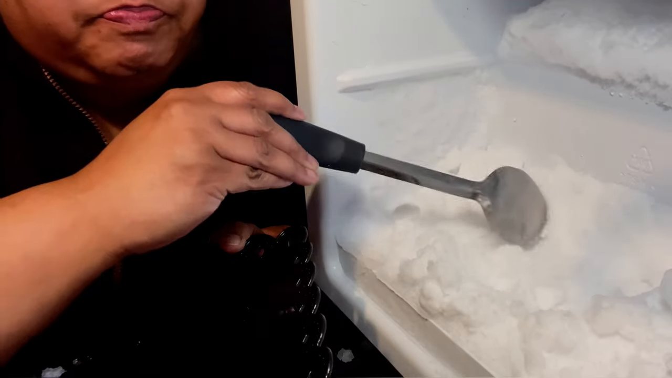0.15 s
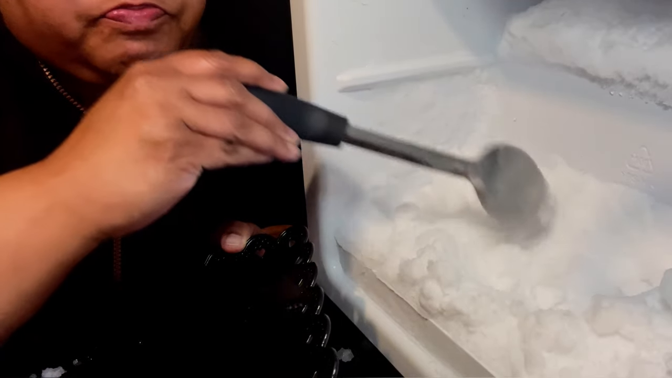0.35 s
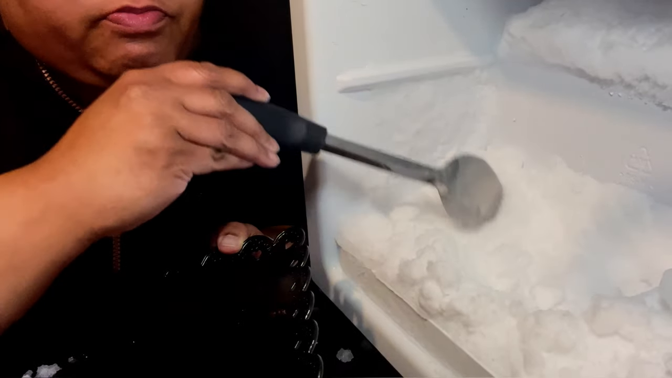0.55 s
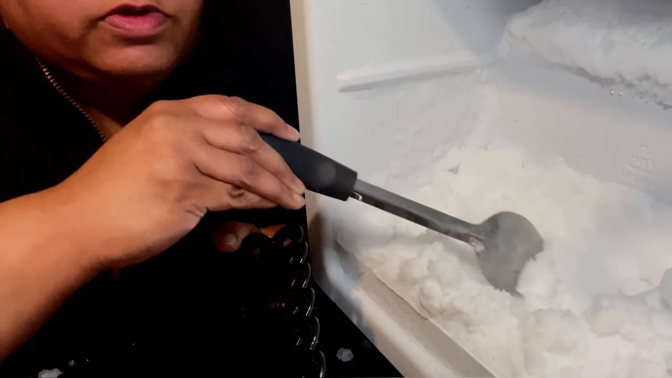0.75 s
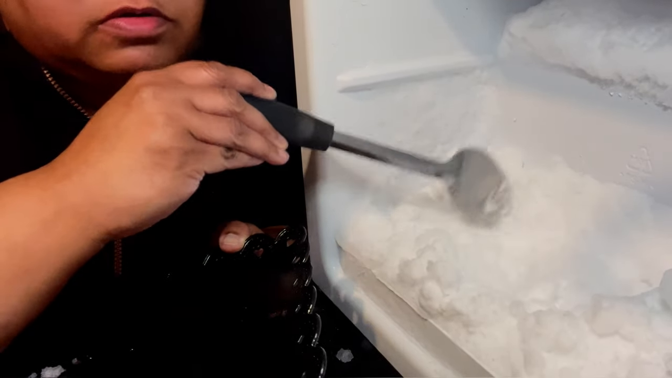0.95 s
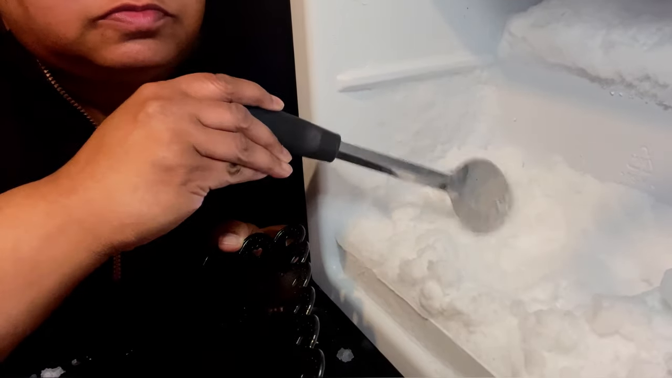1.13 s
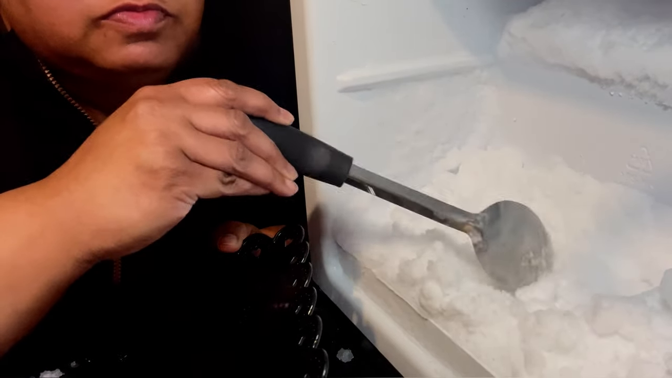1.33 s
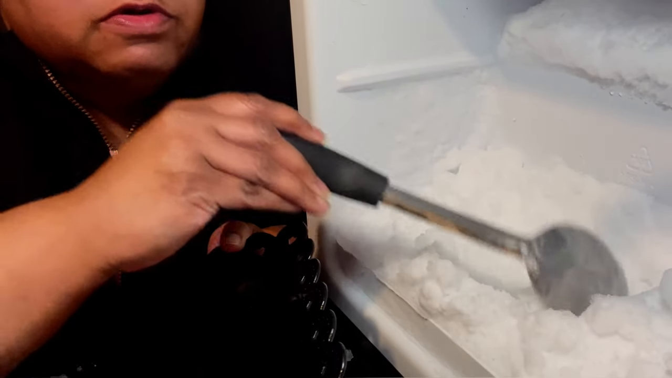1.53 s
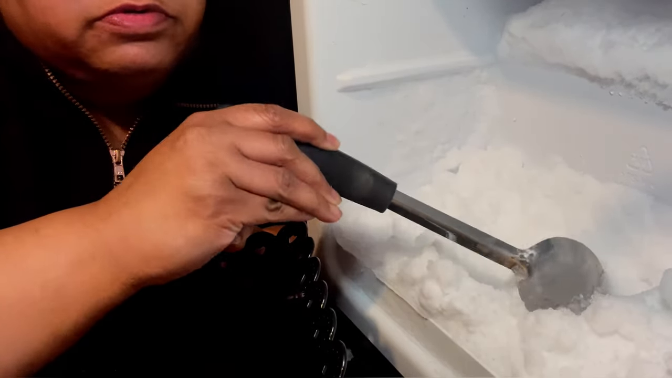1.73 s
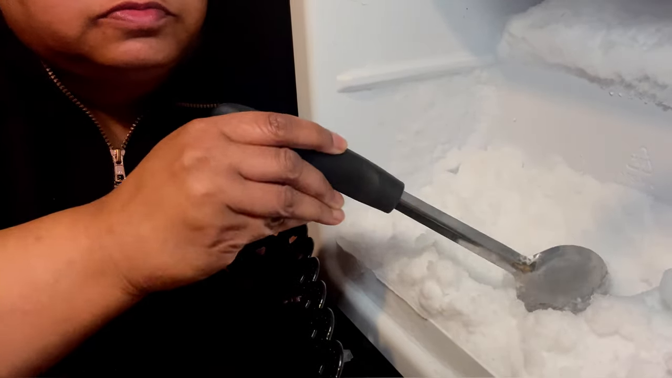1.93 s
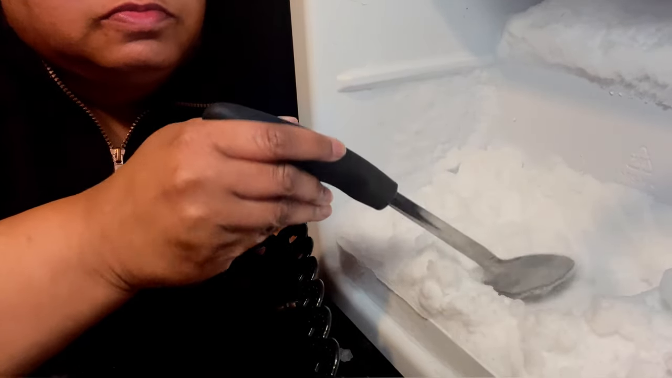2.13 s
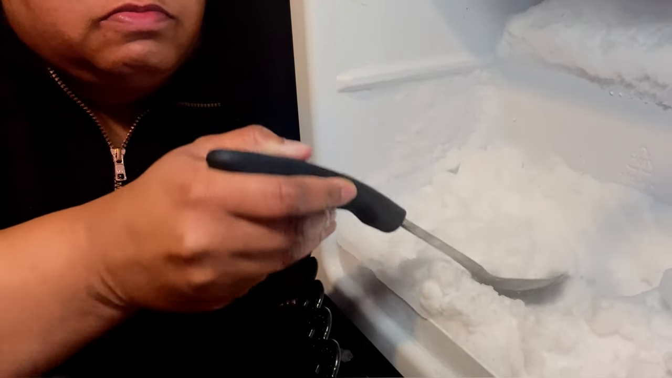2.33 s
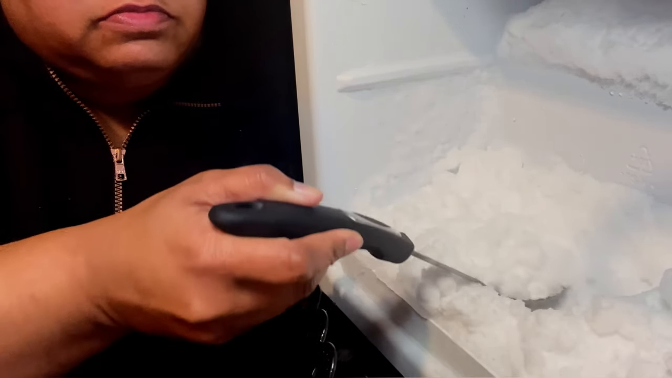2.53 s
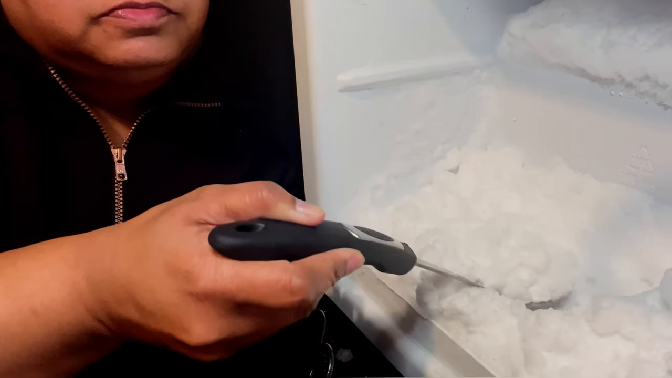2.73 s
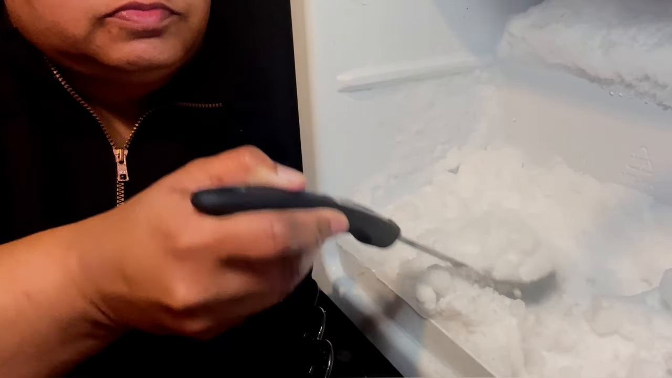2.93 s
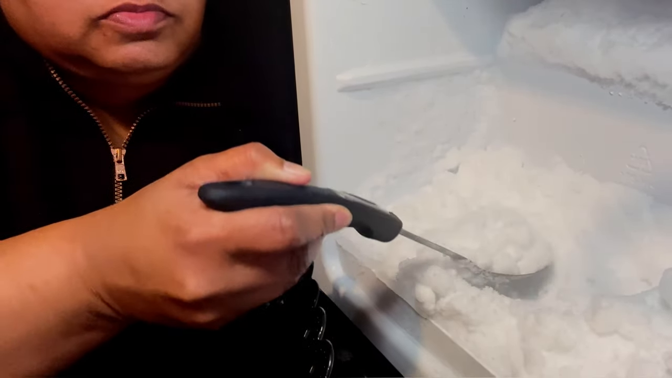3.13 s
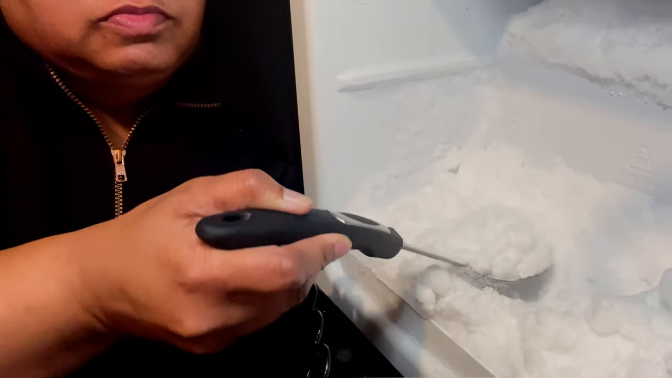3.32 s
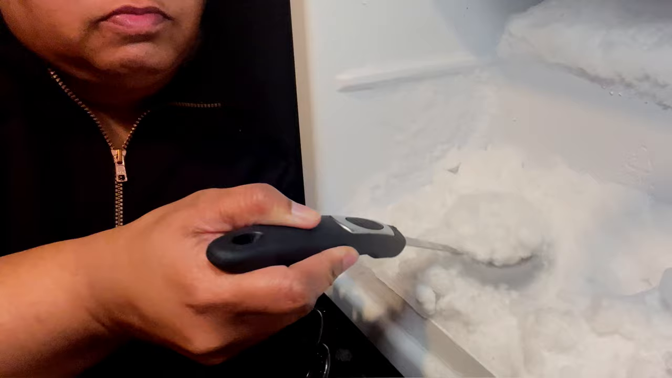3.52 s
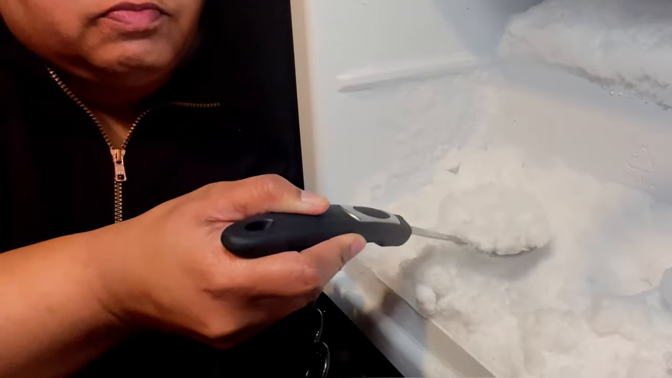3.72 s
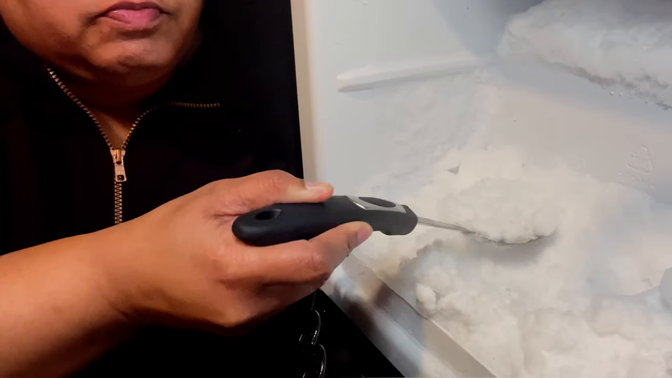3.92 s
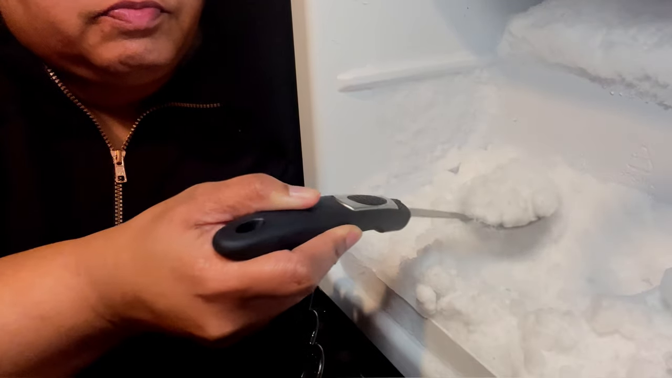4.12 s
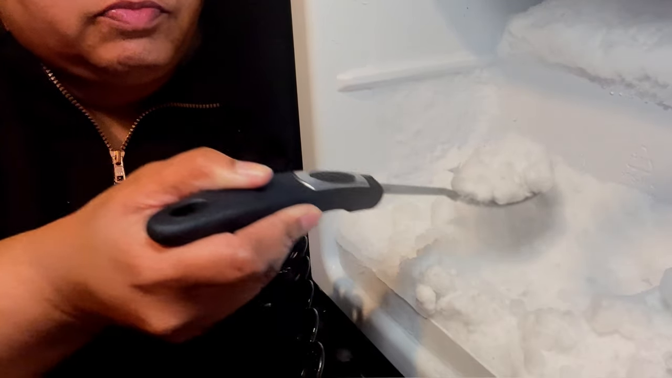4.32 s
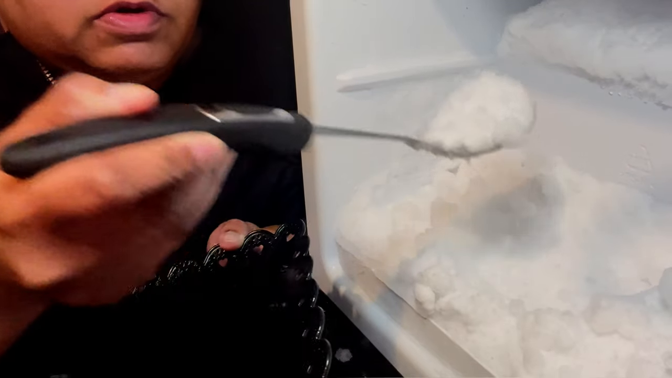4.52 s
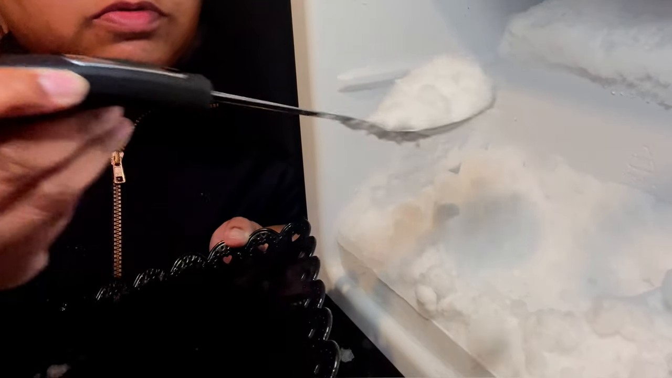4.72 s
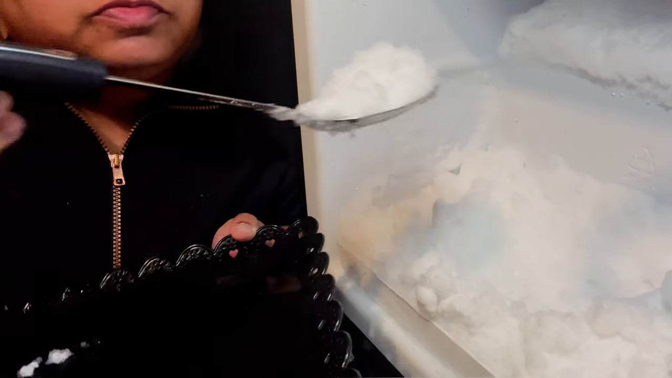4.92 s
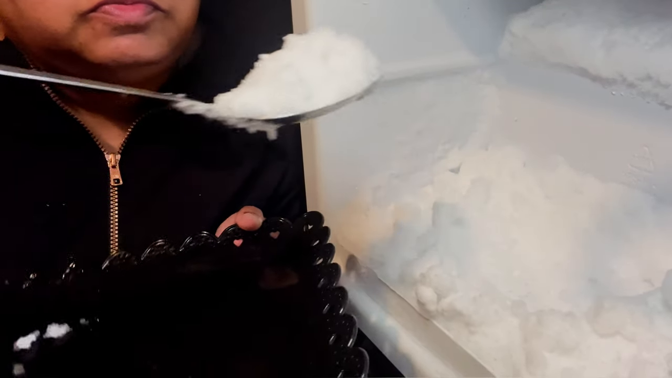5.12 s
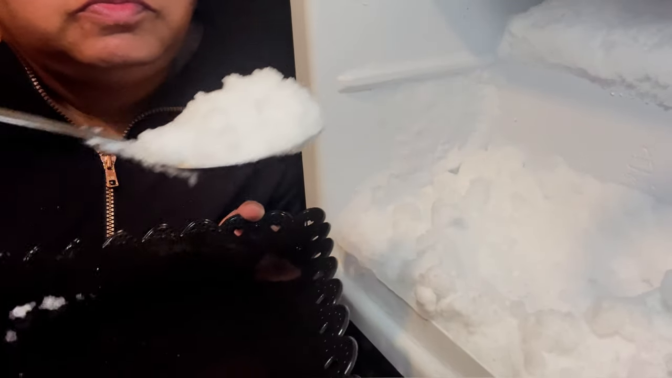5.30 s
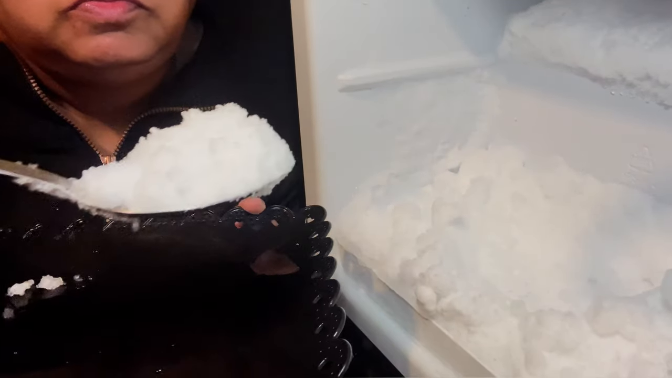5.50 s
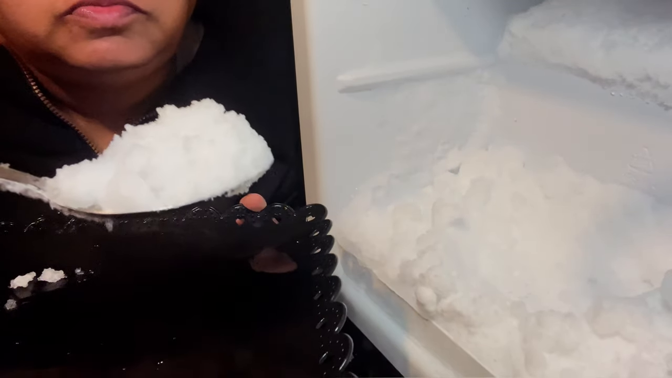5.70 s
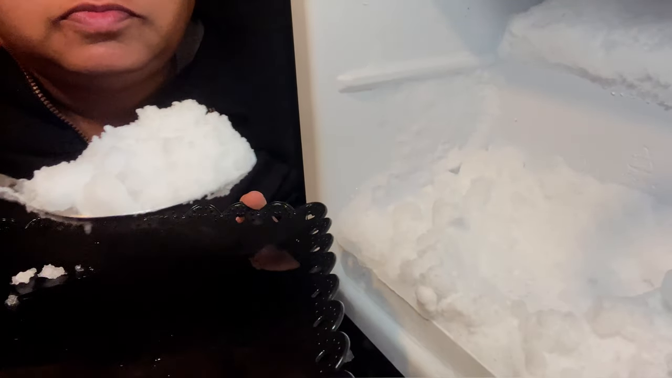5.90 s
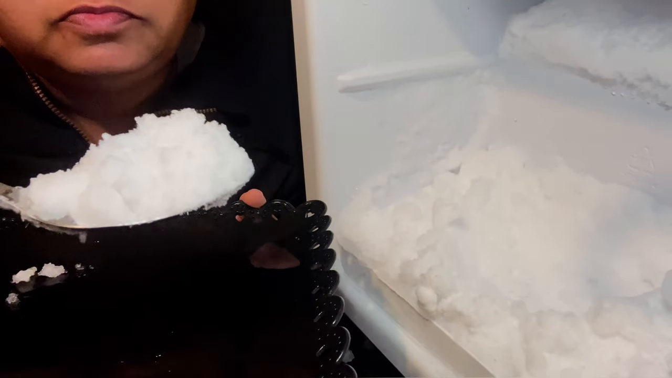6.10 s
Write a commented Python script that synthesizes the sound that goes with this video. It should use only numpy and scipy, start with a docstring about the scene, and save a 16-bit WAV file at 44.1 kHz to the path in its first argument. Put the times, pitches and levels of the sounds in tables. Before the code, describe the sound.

Quick, bright spoon scrapes bite into icy frost, with loud hollow knocks from the plastic wall behind it. Longer gritty drags follow, then duller packing crunches as the bowl fills, and quiet careful creaks. Near the end a sharp crack and falling lump ring a tray and scatter crystals, then soft bumps and tiny ticks. Close stereo, short room tail, low appliance hum with faint high whine.

```python
"""In a kitchen freezer, a metal spoon scrapes and digs packed frost, heard close up in stereo.
Showers of random clicks make the crackling crystals and crusts; blows and drag make the plastic liner boom.
Decaying modes ring the spoon, the ice bed and the tray where a clump lands; the handle ticks near the end.
Coloured noise lays a low machine rumble and a thin electric whine underneath."""
import sys
import numpy as np
from scipy import signal
from scipy.fft import rfft, irfft, next_fast_len
from scipy.io import wavfile
from scipy.ndimage import uniform_filter1d, map_coordinates

SR = 44100
rng = np.random.default_rng(int(sys.argv[2]) if len(sys.argv) > 2 else 0)


def transcribe(u):
    """Save the signal u as a 16-bit wav file named by the first command-line argument.

    u: samples, shape (n,) or (channels, n), limited to [-1, 1]; the rate is SR.
    q: integer samples, one column per channel.
    """
    v = np.clip(np.atleast_2d(u).T, -1, 1)
    q = np.round(v * 32767).astype(np.int16)
    wavfile.write(sys.argv[1], SR, q)


N = 271213
TIME = np.arange(N) / SR
FFT_SIZE = next_fast_len(N + SR, real=True)
FREQS = np.maximum(np.arange(FFT_SIZE // 2 + 1) * SR / FFT_SIZE, 1)


def from_db(db):
    """Decibels to an amplitude factor."""
    return 10 ** (np.asarray(db) / 20)


def rms(x):
    """Root mean square, kept just above zero."""
    return np.sqrt(np.mean(x ** 2) + 1e-20)


def over_hz(points):
    """A table joined by straight lines on a log-frequency axis."""
    hz, value = np.transpose(points)
    return np.interp(np.log(FREQS), np.log(hz), value)


def filtered(x, response):
    """Shape a sound by a frequency response."""
    return irfft(rfft(x, FFT_SIZE) * response, FFT_SIZE)[..., :N]


def colour(x, spectrum):
    """Causal (minimum-phase) filter with the given spectrum."""
    cepstrum = irfft(np.log(from_db(over_hz(spectrum))), FFT_SIZE)
    # folding the cepstrum forward in time gives minimum phase
    cepstrum[1:FFT_SIZE // 2] *= 2
    cepstrum[FFT_SIZE // 2 + 1:] = 0
    return filtered(x, np.exp(rfft(cepstrum)))


def drift(rate):
    """Random wander with rms 1: straight lines between random points, rate of them a second."""
    knots = rng.standard_normal(int(N / SR * rate) + 2)
    slow = np.interp(TIME * rate, np.arange(len(knots)), knots)
    return slow / rms(slow)


def bursts(rows, rise):
    """Envelope of sudden rises that die away, from rows (time [s], level [dB], decay constant [s])."""
    out, age = np.zeros(N), TIME[:SR // 2]
    for s, db, decay in rows:
        start = int(s * SR)
        burst = from_db(db) * (1 - np.exp(-age / rise)) * np.exp(-age / decay)
        out[start:start + len(age)] += burst[:N - start]
    return out


def blows(rows, contact):
    """Smooth force pulses, area set by level, from rows (time [s], level [dB], ..)."""
    force = np.zeros(N)
    for s, db, *rest in rows:
        force[int(s * SR)] += from_db(db)
    age = TIME[:SR // 20]
    pulse = age * np.exp(-age / contact)
    return signal.fftconvolve(force, pulse / pulse.sum())[:N]


def ring(force, modes, low_hz):
    """A force sets decaying modes ringing; a high-pass at low_hz thins the bottom."""
    age = TIME[:SR]
    response = sum(from_db(db - 60 * age / t60) * np.sin(2 * np.pi * hz * age) for hz, db, t60 in modes)
    high_pass = signal.butter(2, low_hz, "high", fs=SR, output="sos")
    return signal.sosfilt(high_pass, signal.fftconvolve(force, response)[:N])


def wavering(x, lag_s, per_s):
    """The pitch of a ring wanders as the point of contact moves."""
    return np.interp(TIME + lag_s * drift(per_s), TIME, x)


def fractures(per_s, spread_db, clump_db, clump_rate):
    """Crystals break at random with uneven sizes, clumped by stick and slip; rms 1."""
    sizes = from_db(spread_db * np.minimum(rng.exponential(1, N), 4)) * rng.choice([-1, 1], N)
    breaks = rng.random(N) < per_s / SR
    clicks = sizes * breaks * from_db(clump_db * drift(clump_rate))
    return clicks / rms(clicks)


def crumbling():
    """Frost collapsing under a blow: dense, nearly even fractures."""
    return fractures(per_s=6000, spread_db=2.0, clump_db=1.0, clump_rate=300)


# how far the left capsule leads the right: (frequency [Hz], phase lead [rad])
PHASE_LEAD = [(290, 0.5), (540, -2), (1900, -1.5), (3000, -5), (5400, -5), (6600, -3), (8200, -3),
              (11000, -0.35), (12300, -5), (14000, 9.5), (15500, 10.5)]


def direct_path():
    """Sound from the freezer reaches the two capsules out of step."""
    return np.array([np.ones(len(FREQS)), np.exp(-1j * over_hz(PHASE_LEAD))])


# how much of the energy arrives unscattered: (frequency [Hz], direct share [0-1])
DIRECT_SHARE = [(250, 0.98), (600, 0.039), (5500, 0.38), (7400, 0.86), (9800, 0.83), (11700, 0.15),
                (13500, 0.6)]
# left capsule against right: (frequency [Hz], level difference [dB])
LEFT_OVER_RIGHT = [(500, -2), (1100, -3), (2000, 2), (5500, -4), (9500, 4), (12000, 1.5), (14000, 2)]


def compartment():
    """Responses at the two capsules: for direct sound, and for sound scattered by the frost and walls."""
    share = np.clip(over_hz(DIRECT_SHARE), 0, 1)
    balance = from_db(over_hz(LEFT_OVER_RIGHT) * np.array([[.5], [-.5]]))
    return np.sqrt(share) * direct_path() * balance, np.sqrt(1 - share) * balance


def crackle(clicks, envelope, spectrum, paths, scatter_s=0.0025):
    """Each fracture happens at a new spot, so each has its own short scattered tail."""
    direct, scattered = paths
    keep = np.exp(-1 / (scatter_s * SR))
    tail_energy = signal.lfilter([1 - keep], [1, -keep], clicks ** 2 + 1e-18)
    tails = np.sqrt(tail_energy) * rng.standard_normal((2, N))
    shape = from_db(over_hz(spectrum))
    # the response midway between the capsules sets the loudness
    middle = shape * np.sqrt(np.abs(direct.mean(axis=0)) ** 2 + np.mean(scattered ** 2, axis=0) / 2)
    heard = filtered(clicks * envelope, direct) + filtered(tails * envelope, scattered)
    return colour(heard, spectrum) / rms(middle)


# low machine rumble, spectrum: (frequency [Hz], relative level [dB])
RUMBLE = [(25, -24.5), (55, 3.5), (100, -4), (260, -17.5), (400, -27), (800, -38.5), (1500, -41),
          (14000, -59.5)]
# narrow noise bands of the electric whine: (frequency [Hz], width at half amplitude [Hz], level [dB])
WHINE = [(9600, 150, -70.5), (11060, 400, -62)]


def background():
    """Low machine rumble, mostly common to both sides, and a thin electric whine, from shaped noise."""
    rumble = colour(rng.standard_normal(N) + .45 * rng.standard_normal((2, N)), RUMBLE)
    out = from_db(-37.5) * rumble / rms(rumble)
    for hz, width, db in WHINE:
        band = 1 / (1 + (2 * (FREQS - hz) / width) ** 2)
        whine = filtered(rng.standard_normal((2, N)), band)
        out = out + from_db(db) * whine / rms(whine)
    return out


# spoon jolts: (time [s], relative liner boom level [dB], relative frost crunch level [dB])
JOLTS = [(0.051, -25.5, -10.5), (0.145, -12.5, -14.5), (0.196, -11, -22.5), (0.483, -16, -10.5),
         (0.62, -4, -21), (0.754, -7, -21.5), (0.996, -15.5, -0.5), (1.002, 8.5, -33),
         (1.156, -10.5, -15.5), (1.815, -5.5, -55.5), (1.893, -8, -40), (2.035, -11, 1),
         (2.039, 2.5, -18.5), (2.124, -14.5, -13.5), (2.141, -5.5, -26), (2.474, -14, -7),
         (2.543, -13.5, -5), (2.557, -14, -26.5), (2.7, -8, -32), (2.812, -14.5, -32.5),
         (2.858, -14.5, -10.5), (3.002, -7, -17.5), (3.443, -2.5, -24.5), (3.468, 1, -30.5),
         (4.079, -55.5, -12), (4.766, -6, -32.5), (4.829, -16, -0.5)]
# coarse crunch of crushed frost, spectrum: (frequency [Hz], relative level [dB])
CRUNCH = [(100, -7), (250, 0.5), (450, -5), (770, 2), (1320, -2), (2200, -7.5), (2900, -12.5), (5000, -37)]
# frost compacting under a blow, spectrum: (frequency [Hz], relative level [dB])
THUD = [(100, -3.5), (250, 9), (550, 3), (1200, -0.5), (2500, -18), (6000, -28.5)]
# plastic liner modes: (frequency [Hz], relative level [dB], 60 dB decay time [s])
LINER = [(134.7, -15.5, 0.33), (207, -15.5, 0.13), (237, -3.5, 0.075), (254.8, 1, 0.2), (291, -14.5, 0.16),
         (404.6, -12, 0.14), (522, -13, 0.13), (779, -14.5, 0.19), (1207, -6.5, 0.05)]


def jolting(paths):
    """The spoon slips and strikes: a crack and a crunch in the frost, and a boom of the liner."""
    crack = bursts([(s, crunch_db, .004) for s, boom_db, crunch_db in JOLTS], rise=.0003)
    crush = bursts([(s, crunch_db - 5.5, .017) for s, boom_db, crunch_db in JOLTS], rise=0.0044)
    crunch = crackle(crumbling(), from_db(-7.0) * crack, CRUNCH, paths)
    crunch = crunch + crackle(crumbling(), crush, THUD, paths)
    boom = from_db(-2.0) * ring(blows(JOLTS, contact=0.00037), LINER, low_hz=193)
    return crunch + filtered(boom, direct_path())


# strokes of the spoon through the frost, relative levels at mid-stroke: (start [s], length [s],
# crystal hiss [dB], crush [dB], push on the liner [dB], swell from start to end [dB])
STROKES = [(0.073, 0.082, -24, -16, -22.5, -2.5), (0.192, 0.032, -22, -27.5, -28, 8),
           (0.455, 0.12, -26.5, -17, -25, 8.5), (0.526, 0.23, -25.5, -15, -19.5, -2),
           (0.746, 0.01, -20, -15, -23.5, -1.5), (0.963, 0.078, -35.5, -29.5, -23, 11),
           (1.144, 0.052, -29, -31, -30, -2.5), (1.32, 0.13, -37, -50.5, -37.5, 5),
           (1.555, 0.2, -21, -20, -16, -3), (1.81, 0.24, -29.5, -28, -26.5, -12),
           (1.929, 0.09, -20, -29.5, -23.5, 6), (2.113, 0.12, -26.5, -20.5, -16, -10),
           (2.191, 0.14, -26.5, -21.5, -22, -16), (2.337, 0.099, -34, -28, -25.5, 10),
           (2.463, 0.2, -31, -24, -17.5, -16), (2.639, 0.13, -32, -28, -17.5, -15.5),
           (2.797, 0.031, -36.5, -39.5, -19.5, 3), (2.837, 0.19, -33.5, -37.5, -23, -11),
           (3.05, 0.12, -36, -30.5, -28.5, 7.5), (3.152, 0.14, -40.5, -37, -28.5, 0.5),
           (3.474, 0.13, -38.5, -36.5, -30, 4.5), (3.669, 0.12, -42, -33, -37.5, 10),
           (3.776, 0.13, -36.5, -27.5, -31.5, -9), (3.946, 0.14, -35, -29.5, -51.5, 5),
           (4.09, 0.36, -45.5, -45.5, -44, -14), (4.25, 0.27, -47, -52, -44, 1.5),
           (4.544, 0.078, -43.5, -35, -44.5, 7)]


def stroking(index, shape):
    """Gain of one layer (0 hiss, 1 crush, 2 push): each stroke bites, holds while it swells or eases, lets go."""
    attack_s, release_db_per_s = shape
    out, age = np.zeros(N), TIME[:SR]
    for start, length, *levels_db, swell_db in STROKES:
        hold_db = levels_db[index] + swell_db * (np.clip(age / length, 0, 1) - .5)
        release_db = release_db_per_s * np.maximum(age - length, 0)
        gain = np.minimum(age / attack_s, 1) * from_db(hold_db - release_db)
        span = slice(int(start * SR), int(start * SR) + SR)
        out[span] = np.maximum(out[span], gain)
    return out


def shifting(x, depth_db, per_s, width_hz):
    """The gap between bowl and frost keeps changing, so peaks and dips wander through the spectrum."""
    hz, s, frames = signal.stft(x, SR, nperseg=256)
    grid = np.meshgrid(hz / width_hz, s * per_s, indexing="ij")
    field = map_coordinates(rng.standard_normal((128, 512)), grid, order=1, mode="mirror")
    gain = from_db(depth_db * field)
    return signal.istft(frames * gain / rms(gain), SR, nperseg=256)[1][:, :N]


# fine ice crystals, spectrum: (frequency [Hz], relative level [dB])
CRYSTALS = [(500, 4), (1500, 7), (2800, 7.5), (4500, 7), (6500, 5.5), (7300, -3), (7700, 3), (8300, -3),
            (9200, -1), (11000, -6.5), (12000, -6), (14000, -10), (15600, -21)]
# loose crystals spill and sift down: (time [s], relative level [dB], decay constant [s])
SPILLS = [(4.761, -27, 0.09), (4.825, -23, 0.045), (4.978, -32.5, 0.018), (5.221, -53, 0.17)]
# the edge bites the crystals first: (attack [s], release [dB/s])
HISS_SHAPE = (0.0049, 312)
# then it packs the frost: (attack [s], release [dB/s])
CRUSH_SHAPE = (0.023, 137)


def scraping(paths):
    """The spoon's edge shears fine crystals and crushes the packed layer; spilt crystals hiss the same way."""
    grip = from_db(1.8 * drift(80))   # the edge catches and lets go, swelling both layers together
    crystals = fractures(per_s=2200, spread_db=2.3, clump_db=2.7, clump_rate=230)
    lumps = fractures(per_s=750, spread_db=2.2, clump_db=2.8, clump_rate=150)
    hiss = stroking(index=0, shape=HISS_SHAPE) + bursts(SPILLS, rise=0.0016)
    crush = stroking(index=1, shape=CRUSH_SHAPE)
    fine = crackle(crystals, from_db(0.76) * hiss * grip, CRYSTALS, paths)
    coarse = crackle(lumps, from_db(1.5) * crush * grip, CRUNCH, paths)
    return shifting(fine + coarse, depth_db=3.8, per_s=26, width_hz=318.0)


# last, the edge loads the liner: (attack [s], release [dB/s])
PUSH_SHAPE = (0.054, 160)
JUDDER_PER_S, JUDDER_DB = 45, 2.5   # stick and slip: changes of load per second, rms depth in dB


def shaking():
    """The juddering drag of the spoon shakes the liner."""
    drag = fractures(per_s=900, spread_db=1.0, clump_db=3.0, clump_rate=34)
    shake = wavering(ring(drag, LINER, low_hz=90.6), lag_s=.0016, per_s=24)
    # level out the ring: the hand sets the strength of the drag
    shake /= np.sqrt(uniform_filter1d(shake ** 2, size=900) + 1e-9)
    judder = from_db(JUDDER_DB * drift(JUDDER_PER_S))
    push = from_db(0.84) * stroking(index=2, shape=PUSH_SHAPE)
    return filtered(push * shake * judder / rms(judder), direct_path())


# crusts snapping: (time [s], relative level [dB])
SNAPS = [(0.083, -20), (0.479, -14), (0.669, -3.5), (0.68, -8.5), (0.74, -9), (0.969, -24.5), (0.993, -6),
         (1.15, -4.5), (1.322, -32), (1.423, -14), (1.463, -21), (1.542, -15), (1.723, -9.5), (1.752, -6.5),
         (2.185, -6), (2.453, -4.5), (2.471, -2), (2.541, -1.5), (2.647, -19), (2.858, -10.5),
         (3.436, -23.5), (3.462, -18), (3.562, -13), (4.078, -5), (4.55, -20.5), (4.758, -4), (4.82, -12),
         (4.831, -5), (5.22, -29.5)]
SNAP_S = 0.0039   # decay constant of a snap, seconds
CHIPS_PER_S, CHIP_DB, CHIP_S = 20, -11, 0.0025   # chips a second, gain on the hiss envelope, decay constant


def snapping(paths):
    """A crust gives way in a few milliseconds of packed fractures; smaller chips fly at random in the strokes."""
    sudden = bursts([(s, db, SNAP_S) for s, db in SNAPS], rise=.0005)
    breaks = (rng.random(N) < CHIPS_PER_S / SR).astype(float)
    chips = signal.fftconvolve(breaks, np.exp(-TIME[:SR // 20] / CHIP_S))[:N]
    chips *= from_db(CHIP_DB) * stroking(index=0, shape=HISS_SHAPE)
    return crackle(crumbling(), from_db(-3.0) * sudden + chips, CRYSTALS, paths)


# loose dry crystals glitter, packed frost is duller: (time [s], top over the rest [dB])
GLITTER = [(1.3, 32.5), (1.7, 13), (4.65, 10.5), (4.75, 24)]


def glittering(x, pivot_hz=7000):
    """The balance above and below the pivot tilts with how loose the crystals are."""
    top = filtered(x, 1 / (1 + (pivot_hz / FREQS) ** 6))
    lift = from_db(np.interp(TIME, *np.transpose(GLITTER)) / 2)
    return top * lift + (x - top) / lift


# resonances of the bare bowl, heard in the scrape: (frequency [Hz], gain [dB])
BARE_BOWL = [(2400, 2.5), (2770, 7.5), (3100, 6), (4100, 4.5), (5600, -5.5), (7400, -3.5), (8200, -3),
             (8790, 5), (9050, -4), (9350, 1.5), (10000, -8.5), (10900, 1), (12100, -5.5), (12800, -3.5)]


def bare_bowl(frost, load):
    """The emptier the bowl, the more its resonances colour the scrape; packed frost damps them."""
    return load * frost + (1 - load) * colour(frost, BARE_BOWL)


# steel spoon packed with frost, modes: (frequency [Hz], relative level [dB], 60 dB decay time [s])
SPOON = [(705, -13, .05), (910, -6, .04), (1610, -7, .04), (2130, -7, .03), (2290, -8, .03),
         (2740, -7, .055), (3850, -6, .045), (7640, -12, .039), (8820, -13, .045), (9400, -2, .022)]
# the edge breaks free and the steel rings: (time [s], relative level [dB])
PRIES = [(2.473, -11.5), (2.544, -14.5), (2.859, -1), (4.079, -42), (4.09, -7)]


def spoon_ringing(frost):
    """Fractures keep the frost-laden steel ringing, and it is struck again as the edge breaks free."""
    pries = filtered(blows(PRIES, contact=0.00004), direct_path())
    force = from_db(-44.0) * frost + pries
    return np.array([wavering(ring(side, SPOON, low_hz=500), lag_s=.0005, per_s=30) for side in force])


# stick and slip lock on to the liner's main mode: (middle [s], half length [s], level [dB])
GROANS = [(0.613, 0.035, -14), (1.678, 0.087, -12.5)]
GROAN_HZ = 259.3   # centre of the wandering pitch


def groaning():
    """Under a firm, even drag the liner is driven steadily at its main mode."""
    level = sum(from_db(db) * np.exp(-((TIME - s) / half) ** 6) for s, half, db in GROANS)
    return level * np.sin(2 * np.pi * np.cumsum(GROAN_HZ + 13 * drift(70)) / SR)


# the edge knocks on hard ice: (time [s], relative level [dB])
KNOCKS = [(0.608, -11), (0.997, -12), (1.046, -14), (2.033, -8.5), (3.437, -15.5), (3.463, -13)]
# ice bed modes: (frequency [Hz], relative level [dB], 60 dB decay time [s])
ICE = [(388, -10.5, 0.1), (485, -3, 0.13), (601, 1.5, 0.063)]


def knocking():
    """Hollow knocks: short blows of the edge ring the ice bed."""
    return filtered(ring(blows(KNOCKS, contact=0.00008), ICE, low_hz=354), direct_path())


# steel squeaks: (middle [s], centre pitch [Hz], level [dB], half length to 1/e [s])
SQUEAKS = [(0.8505, 2180, -17, 0.002), (0.857, 2250, -23, 0.005), (3.663, 2000, -26, 0.0025)]


def squeaking():
    """Brief chirps of wavering pitch where steel sticks and slips."""
    waver_hz = 40 * drift(500)
    out = np.zeros(N)
    for s, hz, db, half in SQUEAKS:
        swell = from_db(db) * np.exp(-((TIME - s) / half) ** 2)
        out += swell * np.sin(2 * np.pi * np.cumsum(hz + waver_hz) / SR)
    return out


# soft, low bumps of the hand, tray and freezer: (time [s], relative level [dB])
BUMPS = [(1.025, -2), (2.046, -7), (2.2, -7.5), (3.666, -16.5), (4.613, -18.5), (4.640, -16), (5.370, -6),
         (5.402, -10)]


def bumping():
    """Dull knocks: soft blows set a few low modes ringing briefly."""
    # (frequency [Hz], relative level [dB], 60 dB decay time [s])
    modes = [(109, -5.0, 0.054), (139.6, -1.5, 0.12), (188.0, -4.5, 0.1), (375, 10.5, 0.0085),
             (658, -20.0, 0.048)]
    return filtered(ring(blows(BUMPS, contact=0.00084), modes, low_hz=93), direct_path())


# hard grains chink against the bowl: (time [s], relative level [dB])
CHINKS = [(3.072, -32), (3.099, -37), (3.114, -35), (3.137, -29), (3.159, -29.5), (3.477, -40)]
# rim of the bowl, modes: (frequency [Hz], relative level [dB], 60 dB decay time [s])
RIM = [(9540, -1, 0.0044), (10600, -10, 0.0013)]


def chinking():
    """Tiny bright contacts ring the rim as the loaded bowl is eased forward."""
    contacts = bursts([(s, db, SNAP_S) for s, db in CHINKS], rise=.0005) * crumbling()
    return ring(contacts, RIM, low_hz=4000)


# a clump lands on the tray and bursts: (time [s], relative level [dB])
CLUMP = [(4.831, 0), (4.858, -17), (4.913, -25)]
# tray modes: (frequency [Hz], relative level [dB], 60 dB decay time [s])
TRAY = [(84.7, -3, .35), (158, 0, .18), (221, 1, .38), (275, -6, .26), (409, 1.5, .35), (428, -3, .2),
        (530, 1, .23), (610, -1, .23), (684, -5, .2), (975, -2, .15), (1066, -3, .16), (1384, -5, .13)]


def falling_clump(paths):
    """A lump of frost thuds on the tray and crumbles; the pieces rattle on while the tray rings out."""
    crush = bursts([(s, db - 5, .025) for s, db in CLUMP], rise=0.00043)
    rattle = from_db(-40.5) * bursts([(s, db, .07) for s, db in CLUMP], rise=0.01)
    thud = from_db(-7.0) * ring(blows(CLUMP, contact=0.000098), TRAY, low_hz=79.2)
    return crackle(crumbling(), crush + rattle, THUD, paths) + filtered(thud, direct_path())


# the handle ticks as the spoon is turned: (time [s], relative dull body level [dB], bright ping level [dB])
TICKS = [(5.352, -49, -57), (5.367, -51, -44), (5.379, -46, -51), (5.395, -50, -54), (5.469, -68, -53)]
# dull modes of the handle: (frequency [Hz], relative level [dB], 60 dB decay time [s])
HANDLE_BODY = [(680, -1, .012), (920, 0, .013), (2750, -14, .009)]
# bright modes of the handle: (frequency [Hz], relative level [dB], 60 dB decay time [s])
HANDLE_PING = [(4650, -6, .009), (5220, 0, .017)]


def ticking():
    """Small, gritty contacts set the handle's dull and bright modes ringing."""
    body = bursts([(s, body_db, .011) for s, body_db, ping_db in TICKS], rise=.0005) * crumbling()
    ping = bursts([(s, ping_db, .007) for s, body_db, ping_db in TICKS], rise=.0005) * crumbling()
    return filtered(ring(body, HANDLE_BODY, low_hz=503), direct_path()) + ring(ping, HANDLE_PING, low_hz=4250)


def reflections(t60):
    """Frequency response of dense dying echoes, different at each side; unit energy."""
    tail = rng.standard_normal((2, SR)) * from_db(-60 * TIME[:SR] / t60)
    return rfft(tail / np.sqrt(np.sum(tail ** 2, axis=1, keepdims=True)), FFT_SIZE)


def kitchen(x, t60, wet_db):
    """A short room tail of dense echoes, its highest treble dulled by the walls."""
    # (frequency [Hz], gain [dB])
    walls = [(250, 1), (550, 6), (1500, 2.0), (5000, 4), (14000, -26)]
    return from_db(wet_db) * filtered(colour(x, walls), reflections(t60))


# how far the bowl is packed with frost: (time [s], share [0-1])
LOAD = [(1.45, 0.06), (2.3, 1)]


def scene():
    """Mix the digging with its room tail, then add the squeaks, handle ticks and background."""
    paths = compartment()
    load = np.clip(np.interp(TIME, *np.transpose(LOAD)), 0, 1)
    frost = glittering(scraping(paths) + snapping(paths))
    spoon = bare_bowl(frost, load) + spoon_ringing(load * frost) + chinking()
    liner = shaking() + groaning() + jolting(paths)
    dry = spoon + liner + knocking() + falling_clump(paths) + bumping()
    return dry + kitchen(dry, t60=0.37, wet_db=-10.5) + squeaking() + ticking() + background()


CUTOFF_HZ = 15650


def record(dry):
    """Peaks beyond full scale overload the input and clip; the treble is cut steeply."""
    return filtered(np.clip(dry, -1, 1), 1 / (1 + (FREQS / CUTOFF_HZ) ** 160))


dry = scene()
out = record(dry)
transcribe(out)
```